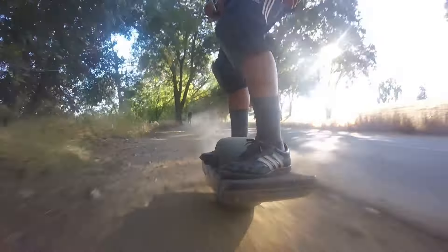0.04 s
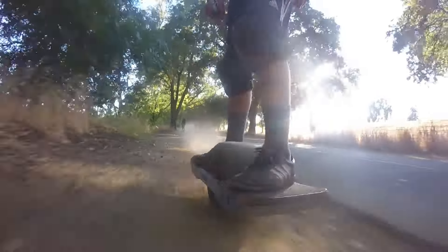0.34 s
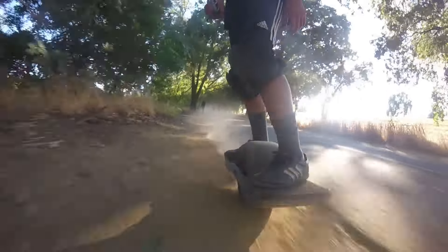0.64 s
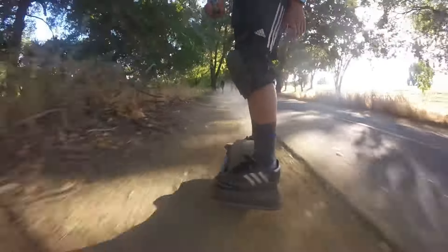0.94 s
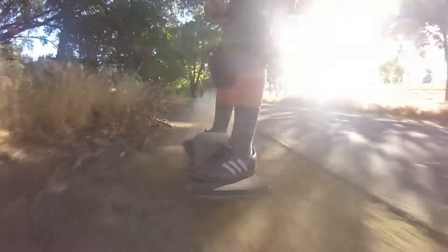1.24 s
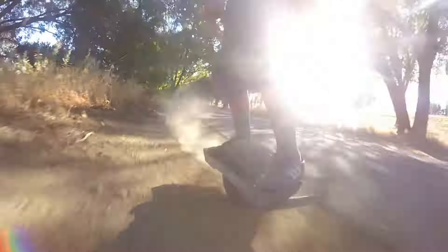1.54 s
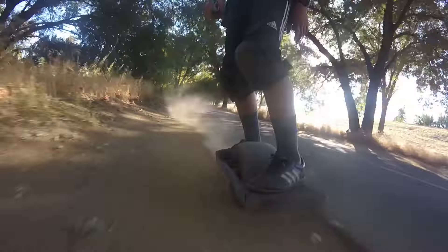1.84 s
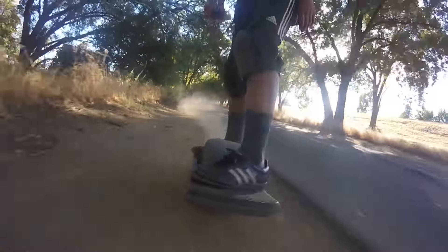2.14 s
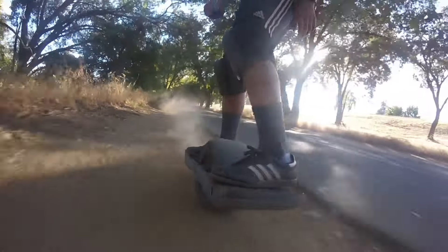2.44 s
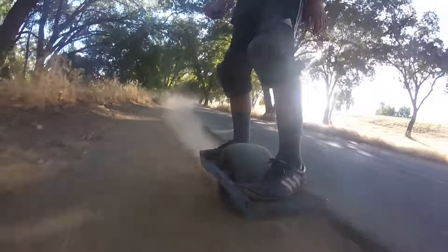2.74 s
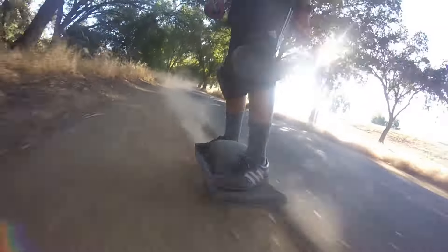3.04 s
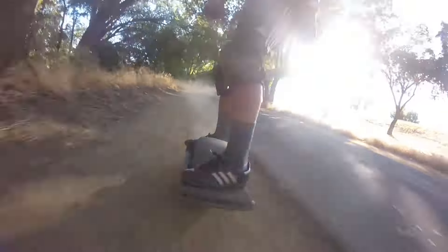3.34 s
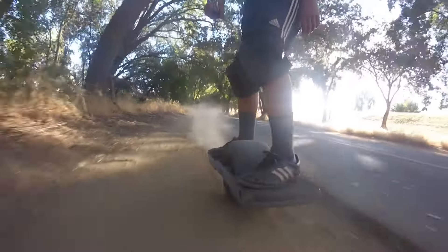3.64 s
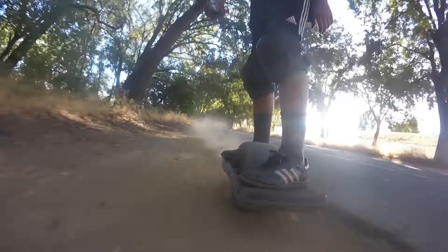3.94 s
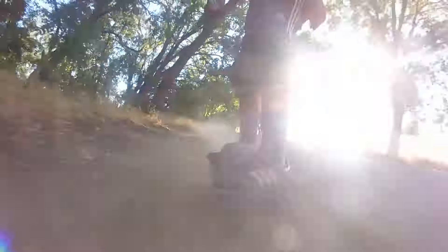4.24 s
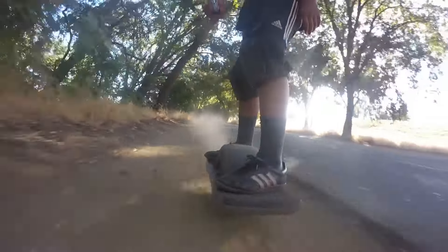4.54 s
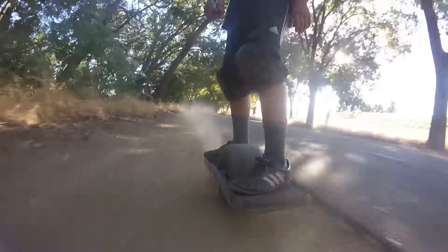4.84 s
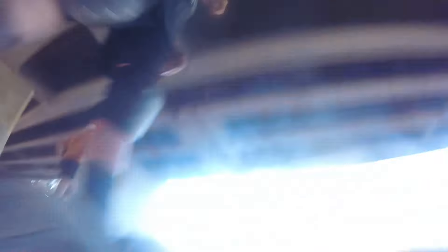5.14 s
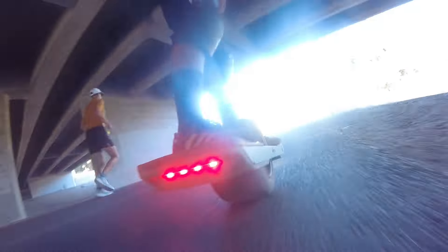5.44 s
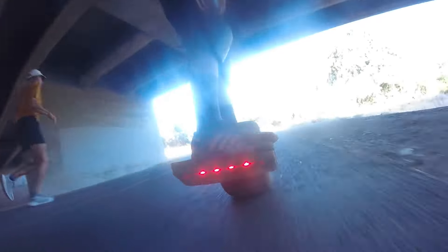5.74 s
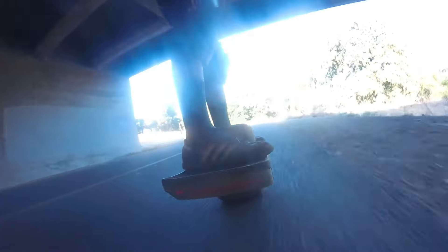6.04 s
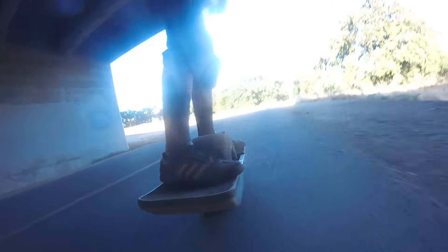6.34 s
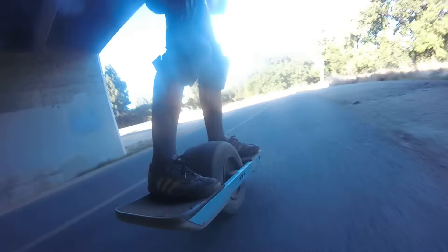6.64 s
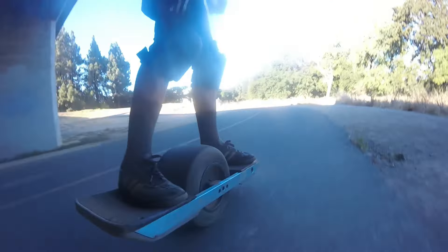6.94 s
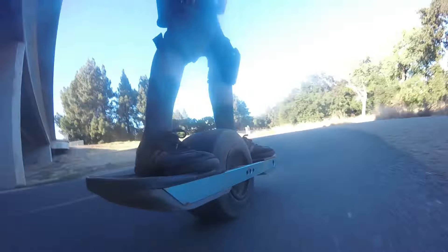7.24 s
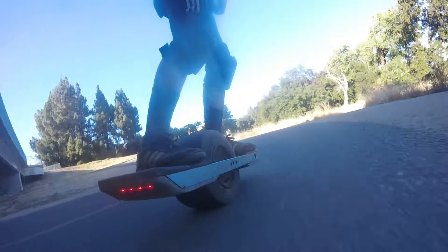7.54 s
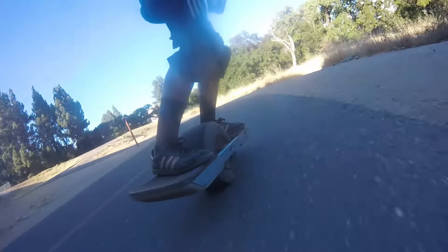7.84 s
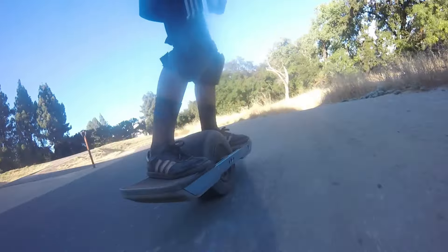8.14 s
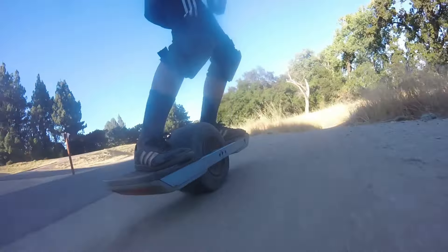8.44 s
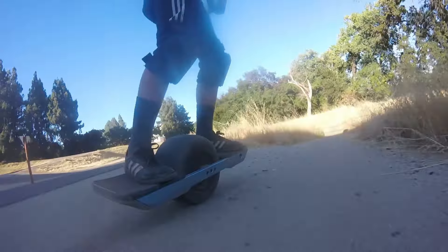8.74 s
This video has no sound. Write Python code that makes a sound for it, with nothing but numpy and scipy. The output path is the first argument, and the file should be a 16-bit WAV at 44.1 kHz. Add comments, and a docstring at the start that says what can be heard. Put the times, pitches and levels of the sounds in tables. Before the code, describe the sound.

Wind buffets a close microphone over a board's tyre crunching through dirt, then an abrupt cut to a duller roar on asphalt.

```python
"""Wind buffets the microphone over the roar of a tyre: a cased camera, held low and close beside a one-wheeled
electric board on a dusty verge. The tyre drones, crunches over small stones and sprays hissing grit; pebbles
knock, and each carve sweeps the sound that bounces off the ground. After a brief gap at 5 s the scene changes
to a ride over smooth asphalt under a bridge, with a duller roar and a clacking deck, and at the end the board
runs onto dirt again."""
import sys
import numpy as np
from scipy import signal
from scipy.fft import rfft, irfft, next_fast_len
from scipy.io import wavfile
from scipy.ndimage import uniform_filter1d, minimum_filter1d, map_coordinates

SR = 44100
rng = np.random.default_rng(int(sys.argv[2]) if len(sys.argv) > 2 else 0)


def unload_wav(signal):
    """Save mono or channel-first audio to the path in sys.argv[1] as 16-bit WAV at rate SR, clipped to [-1, 1]."""
    wavfile.write(
        sys.argv[1],
        SR,
        np.round(np.clip(np.atleast_2d(signal).T, -1, 1) * 32767).astype(np.int16),
    )


N = 386738
TIME = np.arange(N) / SR
VERGE_S, ASPHALT_S = (0, 4.967), (5.001, 8.77)  # the two places: from t/s, to t/s
HISS_PER_EFFORT = 0.49  # dB of hiss for each dB of rolling effort

# On the verge, close beside the tyre: rolling effort, set by speed and ground (t/s, level/dB)
VERGE_EFFORT = [(0, 0), (.2, 1.3), (.45, -2), (.65, 0), (1.1, -0.5), (1.65, 0.5), (2.35, 1), (3.05, -2),
                (3.8, -1), (4.3, 1.4), (4.8, -1.5), (4.96, -3)]
# Spectra of carcass, small stones, grit and sand on the verge (f/Hz, level/dB)
VERGE_DRONE = [(100, -17.5), (200, -4), (260, -4), (340, -0.5), (440, -3), (580, -5.5), (750, -10),
               (1100, -10.5), (1800, -56)]
VERGE_ROAR = [(350, -25.5), (650, -5), (820, -1), (1000, 3), (1280, -0.5), (1500, -7), (1680, -19.5),
              (1850, -26.5), (2600, -33.5)]
VERGE_GRIT = [(1200, -40), (1900, -16.5), (2300, -7), (2700, -6), (3100, 0), (3450, 3), (3780, -2),
              (4130, -20), (5000, -16)]
VERGE_SAND = [(3000, -25), (4200, 0), (4800, 3), (5700, 1), (7000, -3), (9000, -3), (11000, -6.5),
              (12500, -16), (15000, -40)]

def tyre_on_dirt(drone_db, roar_db, grit_db, sand_db):
    """The tyre drones and hums, crunches over small stones and sprays grit and sand."""
    effort, = curves(VERGE_EFFORT)
    lean_m, scrub_db = carving()
    detour_m = BOUNCE_M + lean_m + .0015 * walk(18)  # bumps shake the microphone
    firm_s = np.clip(TIME, 4.51, VERGE_S[1]) - 4.51  # firmer ground at the end: more drone, less grit
    load = undb(walk(32))  # uneven ground presses the tyre harder and softer
    carcass = noise(VERGE_DRONE) + undb(-11 + .7 * effort) * wheel_hum()
    crunch = sag(colour(grains(per_s=3500, spread_db=2.5), VERGE_ROAR), lean_m)
    crunch = ground_bounce(crunch, detour_m, strength=0.027, count=1)
    hiss = sag(colour(grains(per_s=13000, spread_db=3.5), VERGE_GRIT), lean_m)
    hiss = ground_bounce(hiss, detour_m, strength=0.12)
    spray = colour(grains(per_s=9000, spread_db=3.5), VERGE_SAND)
    spray = ground_bounce(spray, detour_m, strength=0.24)
    rumble = carcass * undb(drone_db + 15 * firm_s) + crunch * undb(roar_db)
    dust = hiss * undb(grit_db + scrub_db - 6 * firm_s)
    dust += spray * undb(sand_db - 58 * lean_m)  # fainter as the board leans away
    return load * (rumble * undb(effort) + dust * undb(HISS_PER_EFFORT * effort))


def wheel_hum(hz=438, width_hz=10.45, throb_s=.222, crest_s=.76):
    """The wheel's hum throbs a few times a second; its pitch and level flicker."""
    pitch = hz + width_hz / 2 * walk(45)
    throb = 1 + .47 * np.cos(2 * np.pi * (TIME - crest_s) / throb_s)
    flicker = 1 + .4 * walk(30)
    return unit(np.sin(2 * np.pi * np.cumsum(pitch) / SR) * throb * flicker)


# Carves, about one a second (t/s, half length/s, change in the ground bounce's path/m, extra grit/dB)
CARVES = [(0.037, 0.32, 0.016, 3.5), (1.149, 0.3, 0.02, 3), (2.263, 0.32, 0.035, 3.5),
          (2.851, 0.329, 0.012, 1), (3.418, 0.28, 0.023, 2), (4.252, 0.26, -0.011, 2)]
BOUNCE_M = 0.0972  # riding straight, the ground bounce travels this much further to the microphone

def carving():
    """Each lean shifts the ground bounce; just after the apex the tyre scrubs and throws more grit."""
    lean_m = sum(metres * swell(s, half_s) for s, half_s, metres, _ in CARVES)
    scrub_db = sum(db * swell(s + 0.089, half_s=0.26) for s, _, _, db in CARVES)
    return lean_m, scrub_db


def sag(x, lean_m, share_per_m=.8):
    """The tyre's resonances sink as it leans onto its shoulder."""
    rate = 1 - share_per_m * (lean_m - lean_m[TIME < VERGE_S[1]].mean())
    return map_coordinates(x, [np.cumsum(rate)], order=3, mode="mirror")


def ground_bounce(x, detour_m, strength, count=3, rebound=.45):
    """Bounces between ground and deck reach the microphone late, cutting notches that sweep."""
    lag = detour_m / 343 * SR
    late = sum((-rebound) ** k * map_coordinates(x, [np.arange(N) - (k + 1) * lag], order=3)
               for k in range(count))
    leaning = 9 * np.abs(detour_m - BOUNCE_M)  # more lean, stronger bounce
    patchy_ground = .07 * walk(9)
    share = np.clip(strength + leaning + patchy_ground, 0, 1)
    return unit((x + share * late) / np.hypot(1, share))


# Under the bridge, close beside the tyre: rolling effort, loose sand, tread song (t/s, level/dB)
ASPHALT_EFFORT = [(5.02, -1), (5.4, 0.4), (6.15, -0.8), (6.4, -2.5), (6.9, -0.5), (7.3, 2.5), (7.75, 2.5),
                  (8.05, 0.5), (8.4, 3.5), (8.77, 1.5)]
LOOSE_SAND = [(5.0, -55.5), (5.5, -66), (8.29, -64), (8.33, -52.5), (8.45, -55), (8.65, -58), (8.77, -51)]
SONG_LEVEL = [(5.0, -52), (5.7, -69.5), (5.86, -55), (6.05, -62), (6.4, -66), (6.75, -57), (7.05, -57),
              (7.45, -54), (7.75, -56), (7.95, -64), (8.77, -73)]
# Spectra of carcass, road grain, grit, sand and tread song on asphalt (f/Hz, level/dB)
ASPHALT_DRONE = [(100, -26), (200, 2), (280, 0.5), (380, 0), (490, 3.5), (570, -1.5), (720, -3),
                 (1100, -12.5), (1800, -47)]
ASPHALT_ROAR = [(350, -26), (650, -8), (830, -1.5), (1010, 2.5), (1160, -4.5), (1400, -9), (1650, -20.5),
                (1850, -29.5), (2600, -59.5)]
ASPHALT_GRIT = [(1200, -10), (1900, -2.5), (2250, -1), (2500, -7.5), (2900, -2.5), (3680, -4.5),
                (4100, -15), (5500, -22.5), (9000, -31)]
ASPHALT_SAND = [(3000, -3), (4200, 2), (5400, -1.5), (6600, -4.5), (8000, -7), (10500, -11.5), (12500, -28),
                (15000, -39.5)]
TREAD_SONG = [(2050, -27.5), (2300, -8), (2440, -3.5), (2600, -3), (2850, -27)]

def tyre_on_asphalt(drone_db, roar_db, grit_db):
    """A finer surface: a duller roar, a faintly singing tread, little hiss until the tyre meets sand."""
    effort, = curves(ASPHALT_EFFORT)
    sand_db, = curves(LOOSE_SAND)
    song_db, = curves(SONG_LEVEL)
    load = undb(0.66 * walk(28))
    carcass = noise(ASPHALT_DRONE)
    crunch = colour(grains(per_s=6000, spread_db=2.5), ASPHALT_ROAR)
    hiss = colour(grains(per_s=12000, spread_db=3.0), ASPHALT_GRIT)
    spray = colour(grains(per_s=6700, spread_db=2.5), ASPHALT_SAND)
    song = noise(TREAD_SONG) * undb(song_db)
    rumble = (carcass * undb(drone_db) + crunch * undb(roar_db)) * undb(effort)
    grit = np.hypot(undb(grit_db + HISS_PER_EFFORT * effort), undb(sand_db + 1))  # sand adds grit
    return load * (rumble + song + hiss * grit + spray * undb(sand_db))


# Wind right on the microphone's case: spectra of big eddies and of small ones (f/Hz, level/dB)
BUFFET = [(6, -9.5), (14, -3), (25, 1), (45, -1.5), (70, -5), (100, -13), (160, -32.5), (300, -53)]
VERGE_EDDIES = [(40, -27.5), (80, -1), (120, 3), (170, -3.5), (260, -14), (450, -16.5), (900, -34)]
ASPHALT_EDDIES = [(40, -29), (80, 2.5), (110, 3), (170, -3), (260, -11.5), (450, -18.5), (900, -42.5)]

def wind(eddies, buffet_db, flutter_db):
    """Big slow eddies beat on the case in separate puffs; small ones flutter in bursts."""
    buffet_gain, flutter_gain = airflow([buffet_db, flutter_db])
    buffet = steady(noise(BUFFET), window_s=0.14, share=0.95)
    puffs = unit(undb(3 * np.tanh(walk(14))))
    flutter = steady(noise(eddies) * undb(2 * walk(45)), window_s=0.11, share=0.81)
    return buffet * puffs * buffet_gain + flutter * flutter_gain


# Gusts with the microphone in the open (t/s, length/s, buffet level/dB, flutter level/dB)
GUSTS = [(0.085, 0.5, -19, -28), (0.56, 0.43, -19, -33.5), (1.854, 0.15, -15, -35),
         (2.274, 0.52, -19.5, -42), (2.778, 0.31, -22, -32), (3.469, 0.11, -20, -42),
         (3.688, 0.23, -19, -31.5), (4.004, 0.16, -19, -50), (4.54, 0.56, -19, -34.5),
         (5.602, 0.194, -17.5, -19), (6.03, 0.25, -20, -25.5), (7.092, 0.56, -24, -22),
         (7.885, 0.64, -22.5, -24), (8.27, 0.77, -34, -22)]

def airflow(headwind_db, attack_s=0.11, release_s=0.028):
    """Strength of buffet and flutter: each gust rises, holds and falls on top of the headwind."""
    power = undb(headwind_db)[:, None] ** 2
    for s, length, *db in GUSTS:
        rise = np.clip((TIME - s) / attack_s + .5, 0, 1)
        fall = np.clip((s + length - TIME) / release_s + .5, 0, 1)
        power = power + (undb(db)[:, None] * rise * fall) ** 2
    return np.sqrt(power)


def shelter(db, until_s, swing_s):
    """Share of the wind that reaches the case as it swings out of shelter."""
    return undb(db * np.clip(1 - (TIME - until_s) / swing_s, 0, 1))


# Single big eddies, right on the case (t/s, peak level/dB, f/Hz)
THUMPS = [(0.156, -13, 35.2), (.25, -13, 108), (.277, -9, 39.6), (0.38, -8, 47.2), (.645, -12, 30),
          (0.871, -10, 69), (.945, -9, 32), (2.47, -12.5, 27.6), (2.641, -7.5, 42.3), (3.835, -18, 54.4),
          (4.65, -11, 99), (5.705, -9, 125), (5.75, -11, 55), (6.07, -12, 50), (6.151, -8, 110),
          (6.201, -11, 91), (6.244, -12, 58), (6.33, -8.5, 27.5), (6.561, -10.5, 42), (6.67, -10, 50.5),
          (6.85, -11, 59.6), (7.178, -17, 69.5), (7.29, -13, 101), (7.6, -13, 70), (7.835, -9.5, 28),
          (7.958, -9, 51.5), (8.125, -10, 40), (8.23, -11, 30), (8.685, -11, 84)]

def thumps(half_cycles=0.61):
    """An eddy slaps the case: one or two slow swings of pressure."""
    out, t = np.zeros(N), TIME[:SR // 5]
    middle = t.mean()
    for s, db, hz in THUMPS:
        cycles = hz * (t - middle)
        swing = np.sin(2 * np.pi * (cycles + rng.random()))
        add(out, s - middle, np.exp(-(cycles / half_cycles) ** 2) * swing, db)
    return out


# Pebbles and bumps under the wheel, close by (t/s, peak level/dB, ring f/Hz)
KNOCKS = [(.263, -10, 1030), (.559, -16, 1100), (.616, -10.5, 900), (.652, -16, 1050), (.817, -13, 1060),
          (1.256, -11.5, 940), (1.379, -14, 880), (1.455, -13, 980), (1.857, -12, 1120), (1.995, -14, 930),
          (2.034, -4.5, 1080), (2.042, -9.5, 1040), (2.213, -14, 1010), (3.541, -12, 975),
          (4.102, -14, 1010), (4.479, -10, 1030), (4.533, -9, 990), (4.624, -14, 850), (4.788, -14, 960),
          (5.102, -20, 1270), (5.256, -16.5, 905), (8.101, -14, 895), (8.380, -13, 960), (8.569, -5.5, 962),
          (8.705, -8, 780), (8.709, -12.5, 1120)]
# Modes of a knock (multiple of the ring frequency, level/dB, t60/s)
KNOCK_MODES = [(.45, -19, 0.035), (1, 20.5, 0.015), (1.3, 9.5, 0.044)]

def knocks(top_hz=1350):
    """Each pebble gives a short hollow knock; the soft contact takes off the treble."""
    out, t = np.zeros(N), TIME[:SR // 10]
    soft = signal.butter(6, top_hz, fs=SR, output="sos")
    for s, db, hz in KNOCKS:
        ring = sum(undb(mode_db) * decay(t, t60) * np.sin(2 * np.pi * hz * ratio * t)
                   for ratio, mode_db, t60 in KNOCK_MODES)
        add(out, s, signal.sosfilt(soft, ring), db)
    return out


# Flung grit, right on the case (t/s, peak level/dB before gain_db, length/s)
SCUFFS = [(.614, -30, 0.0071), (.854, -20, 0.0046), (1.031, -27.5, .005), (1.191, -33, .005),
          (3.324, -32, 0.0056), (4.104, -21.5, .007), (4.676, -21.5, 0.0087), (4.793, -31, 0.0065),
          (6.131, -40, 0.0022), (6.172, -38, .002)]
# Spectrum of a scuff (f/Hz, level/dB)
SCUFF_COLOUR = [(2000, -32), (3400, 6), (4500, -3), (5200, 1.5), (6100, -8), (7000, -1), (8200, -0.5),
                (11000, -2), (13500, -12), (15000, -25)]

def scuffs(gain_db):
    """A pinch of grit strikes the case: a bright scuff that swells and dies within milliseconds."""
    out, t = np.zeros(N), TIME[:SR // 10]
    scratch, middle = noise(SCUFF_COLOUR), t.mean()
    for k, (s, db, length) in enumerate(SCUFFS):
        shape = np.exp(-2 * ((t - middle) / length) ** 2)
        add(out, s - middle, shape * scratch[k * len(t):(k + 1) * len(t)], db + gain_db)
    return out


# The deck, close by on the second stretch: clacks (t/s, peak level/dB), spectrum (f/Hz, level/dB)
CLACKS = [(5.093, -35), (5.103, -31), (5.248, -36), (5.256, -29.5), (5.388, -36), (6.739, -36),
          (7.704, -41), (8.307, -35), (8.681, -41), (8.705, -27.5)]
CLACK_COLOUR = [(700, -10), (1400, -9), (2000, 13), (3500, 8), (4500, -4), (6000, -7), (7500, -28),
                (12000, -34)]

def clacks(t60):
    """The deck rattles with a dry, wide crack."""
    out, t = np.zeros(N), TIME[:SR // 10]
    crack = noise(CLACK_COLOUR)
    for k, (s, db) in enumerate(CLACKS):
        add(out, s, decay(t, t60) * crack[k * len(t):(k + 1) * len(t)], db)
    return out


# Tyre slips on the verge (t/s, level/dB, half length/s) and their spectrum (f/Hz, level/dB)
RASPS = [(0.266, -40.5, 0.092), (1.192, -36, 0.007), (1.41, -41, 0.03), (3.457, -36, 0.011),
         (4.483, -43, 0.03), (4.624, -50, 0.05), (4.814, -46, 0.048)]
RASP_COLOUR = [(1800, -31), (2700, -12), (3300, 0), (3750, 1), (4150, -32), (6000, -26), (11000, -30)]

def rasps():
    """The tyre slips for an instant and rasps over the grit."""
    grit = colour(grains(per_s=17000, spread_db=6.0), RASP_COLOUR)
    return grit * sum(undb(db) * swell(s, half_s) for s, db, half_s in RASPS)


# Stones on the board near the asphalt's end (t/s, peak level/dB) and their snap (f/Hz, level/dB)
PINGS = [(7.955, -45), (8.1, -37), (8.167, -44), (8.219, -23.5)]
PING_SNAP = [(2400, -25), (3350, 2), (4400, 0), (5000, -11), (5500, -20), (6100, 0), (7200, -2), (7950, 2),
             (8700, -13), (9400, -2), (10700, -6), (11700, -20), (12400, -5), (13100, -7), (14000, -30)]
# A stone's modes (f/Hz, level/dB relative to the snap, t60/s)
PING_MODES = [(7004, -31, .03), (8100, -25, .018), (9792, -35, .035), (10830, -40, .04)]

def pings(bounce_s=.0019, bounce_db=1.5):
    """A hard little stone hits with a dry snap, bounces once and rings on faintly."""
    out, t = np.zeros(N), TIME[:SR // 10]
    snap = colour(signal.unit_impulse(N), PING_SNAP)[:len(t)]
    snap /= np.abs(snap).max()
    for s, peak_db in PINGS:
        for at, db in ((s, peak_db), (s + bounce_s, peak_db + bounce_db)):
            ring = sum(undb(mode_db) * decay(t, t60) * np.sin(2 * np.pi * (hz * t + rng.random()))
                       for hz, mode_db, t60 in PING_MODES)
            add(out, at, snap + ring, db)
    return out


# Single grains off the tread, close by (t/s, peak level/dB, f/Hz)
TICKS = [(.991, -37, 9000), (5.093, -42, 5600), (5.773, -49, 9500), (6.131, -41, 3800), (6.739, -48, 5350),
         (8.013, -44, 5200), (8.101, -34, 3700), (8.57, -34, 5350), (8.706, -38, 5200)]

def ticks(relative_width=.35, t60=.014):
    """The tread flicks off a grain of grit: a thin, dry tick."""
    out, t = np.zeros(N), TIME[:SR // 10]
    edges = np.exp(relative_width * np.array([-.5, .5]))
    for s, db, hz in TICKS:
        burst = rng.standard_normal(len(t)) * decay(t, t60)
        band = signal.butter(2, hz * edges, "bandpass", fs=SR, output="sos")
        add(out, s, signal.sosfilt(band, burst), db)
    return out


def thud(at_s, half_s, hz, db):
    """A dull, low swell of sound: a bump when short, a boom when long."""
    body = noise([(hz / 2, -18), (hz, 0), (hz * 2, -18)])
    return body * undb(db) * swell(at_s, half_s)


# Whine, loudest as the board swings past the microphone (t/s, level/dB); spectrum (f/Hz, level/dB)
WHINE_LEVEL = [(5.0, -63), (5.2, -58), (5.4, -75), (6.1, -81), (6.9, -71), (7.6, -74), (7.9, -92)]
WHINE_COLOUR = [(13300, -52), (13950, -21), (14140, 4), (14300, -8), (14600, -12), (14770, 2), (14950, -16),
                (15400, -50)]

def whine():
    """A faint sizzling whine at the very top of hearing."""
    db, = curves(WHINE_LEVEL)
    return noise(WHINE_COLOUR) * undb(db)


# Grains picked up from the asphalt, faint behind the roar: spectrum (f/Hz, level/dB)
STRAY_GRIT = [(2500, -16), (4000, 1.5), (5200, 3), (6800, -3), (9500, -8), (12000, -21)]

def stray_grit(db):
    """Lone grains tick off the tread, each with a very short scratch."""
    t = TIME[:SR // 50]
    scratch = rng.standard_normal(len(t)) * decay(t, t60=0.0074)
    loose = signal.fftconvolve(grains(per_s=70, spread_db=1.3), scratch)[:N]
    return colour(loose, STRAY_GRIT) * undb(db)


def undb(db):
    return 10 ** (np.asarray(db) / 20)


def unit(x):
    return x / np.sqrt(np.mean(x ** 2))


def decay(t, t60):
    """A fall of 60 dB every t60 seconds."""
    return np.exp(-np.log(1000) * t / t60)


def swell(at_s, half_s):
    """A smooth rise and fall around a moment, top 1."""
    return np.exp(-((TIME - at_s) / half_s) ** 2)


def curves(table):
    """Each column of a table, joined by straight lines in time."""
    s, *columns = np.transpose(table)
    return [np.interp(TIME, s, c) for c in columns]


def colour(x, points):
    """Causal filter shaped by (f/Hz, level/dB) points; the result has rms 1."""
    size = next_fast_len(N + SR // 4)
    hz, db = np.transpose(points)
    freqs = np.maximum(np.fft.rfftfreq(size, 1 / SR), 1)
    beyond_db = -24 * np.maximum(np.log2(freqs / hz[-1]), 0)
    response = undb(np.interp(np.log(freqs), np.log(hz), db) + beyond_db)
    cepstrum = irfft(np.log(response), size)
    cepstrum[1:size // 2] *= 2  # folding gives minimum phase
    cepstrum[size // 2 + 1:] = 0
    return unit(irfft(rfft(x, size) * np.exp(rfft(cepstrum)), size)[:N])


def noise(points):
    """Noise with the given spectrum, rms 1."""
    return colour(rng.standard_normal(N), points)


def walk(rate):
    """Smooth random wandering at rate steps a second, spread 1."""
    steps = rng.standard_normal(4096)
    return unit(map_coordinates(steps, [TIME * rate], order=1, mode="wrap"))


def grains(per_s, spread_db):
    """Tiny impacts at random moments, most weak and a few strong."""
    hit = rng.random(N) < per_s / SR
    size = undb(spread_db * np.minimum(rng.exponential(size=N), 6))
    return unit(hit * size * rng.choice([-1, 1], N))


def steady(x, window_s, share):
    """Take a share of the chance swells out of a noise."""
    power = uniform_filter1d(x ** 2, int(window_s * SR)) + 1e-6
    return unit(x / power ** (share / 2))


def add(track, s, sound, peak_db):
    """Put a short sound on a track at time s."""
    part = track[int(s * SR):int(s * SR) + len(sound)]
    part += (sound * undb(peak_db) / np.abs(sound).max())[:len(part)]


def stretch(span, rise_s, fall_s):
    """One stretch of the ride: it comes in quickly and stops dead."""
    start, stop = span
    return np.clip((TIME - start) / rise_s, 0, 1) * np.clip((stop - TIME) / fall_s, 0, 1)


def scene():
    """One microphone, low beside the board: the verge, then after a brief gap the scene changes to the asphalt."""
    verge = wind(VERGE_EDDIES, buffet_db=-24, flutter_db=-33)
    verge += tyre_on_dirt(drone_db=-27, roar_db=-28.5, grit_db=-43.5, sand_db=-51) + rasps()
    asphalt = wind(ASPHALT_EDDIES, buffet_db=-19.5, flutter_db=-28.5)
    asphalt *= shelter(db=-9.5, until_s=5.2, swing_s=0.46)
    asphalt += tyre_on_asphalt(drone_db=-30, roar_db=-33, grit_db=-51.5) + stray_grit(db=-70.5)
    asphalt += thud(at_s=5.5, half_s=.35, hz=127, db=-33)  # a boom hangs under the bridge
    asphalt += whine()
    ride = verge * stretch(VERGE_S, rise_s=0.0006, fall_s=0.00086)
    ride += asphalt * stretch(ASPHALT_S, rise_s=0.011, fall_s=0.00039)
    hits = knocks() + scuffs(gain_db=-6) + clacks(t60=0.028)
    bump = thud(at_s=5.257, half_s=0.019, hz=355, db=-19)
    return (ride + hits + bump + thumps() + pings() + ticks())[None]


def record(dry):
    """A limiter in the camera holds down the strongest gusts; the top is cut."""
    ceiling, hold, top_hz = .66, int(.003 * SR), 15000
    allowed = ceiling / np.maximum(np.abs(dry), ceiling)
    gain = uniform_filter1d(minimum_filter1d(allowed, hold), hold)
    return signal.sosfilt(signal.ellip(8, .2, 70, top_hz, fs=SR, output="sos"), dry * gain)


dry = scene()
out = record(dry)
unload_wav(out)
```